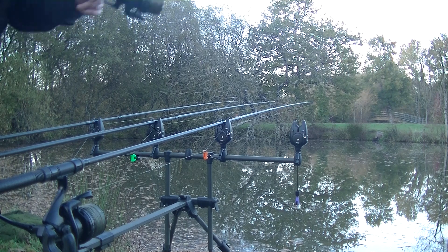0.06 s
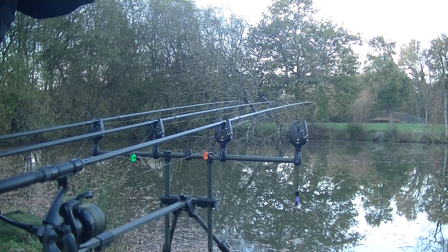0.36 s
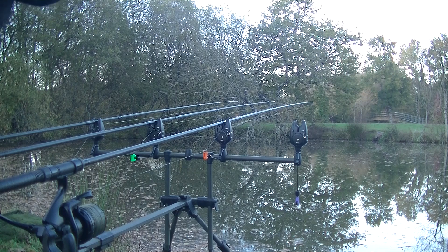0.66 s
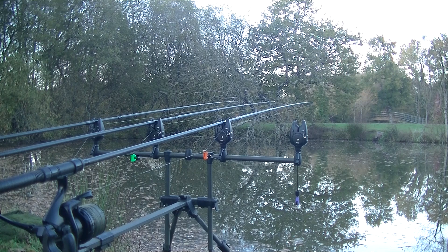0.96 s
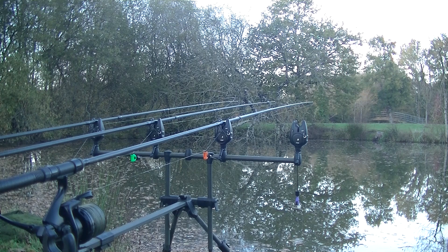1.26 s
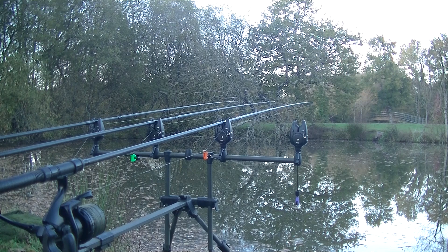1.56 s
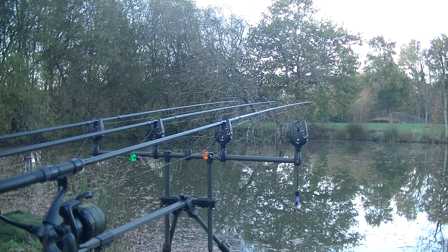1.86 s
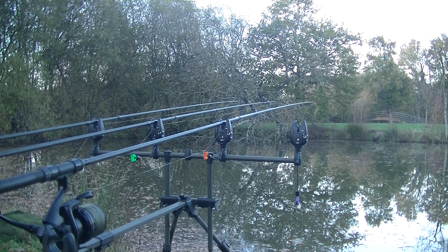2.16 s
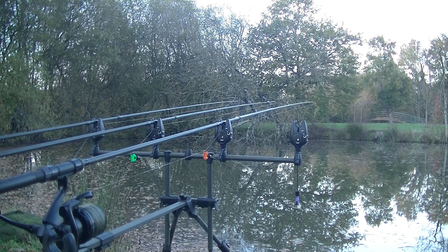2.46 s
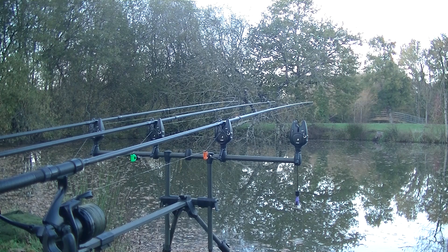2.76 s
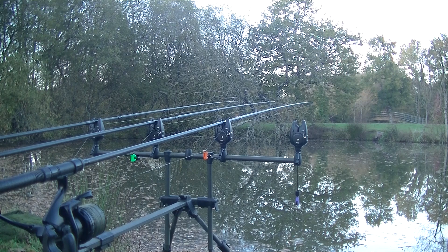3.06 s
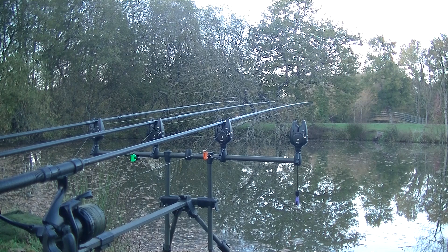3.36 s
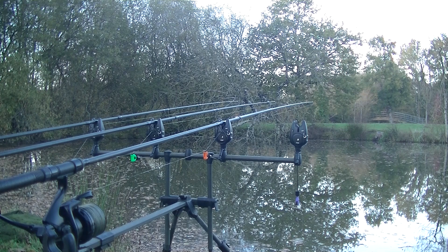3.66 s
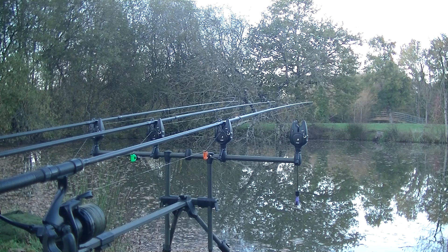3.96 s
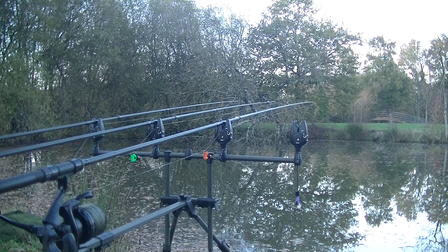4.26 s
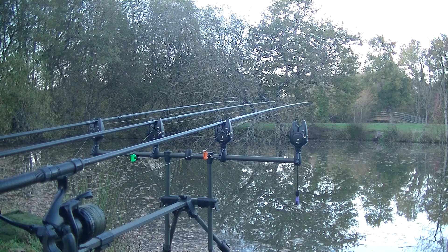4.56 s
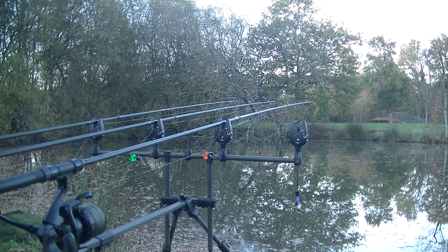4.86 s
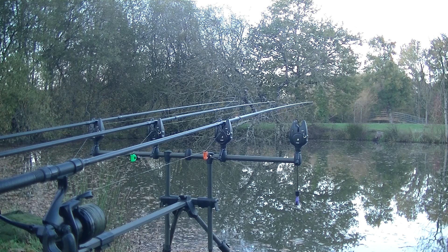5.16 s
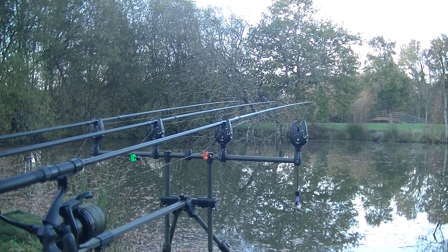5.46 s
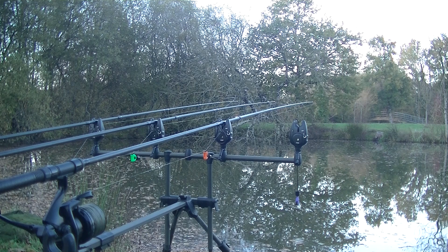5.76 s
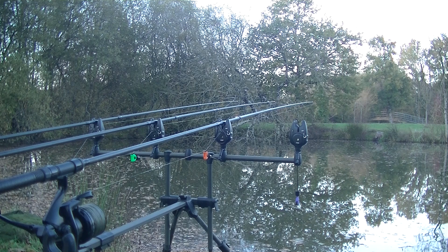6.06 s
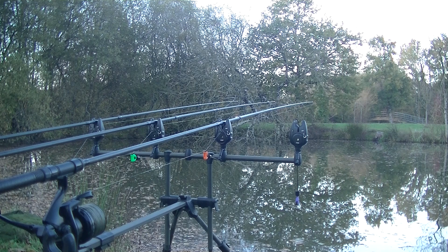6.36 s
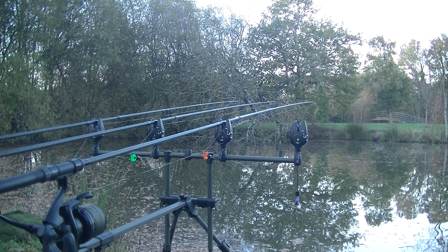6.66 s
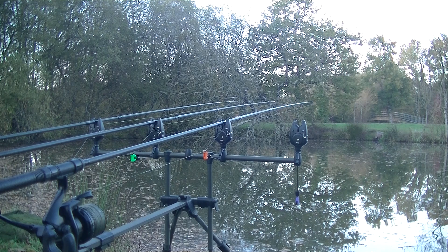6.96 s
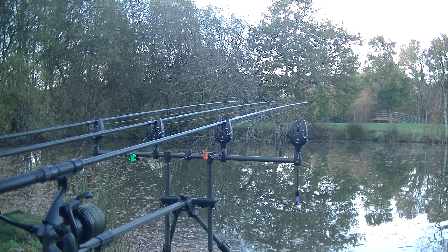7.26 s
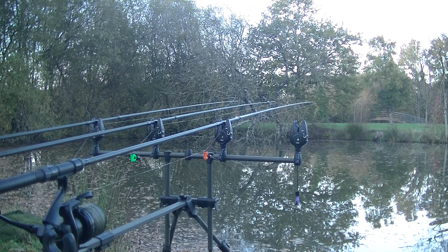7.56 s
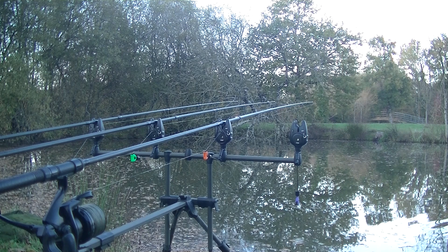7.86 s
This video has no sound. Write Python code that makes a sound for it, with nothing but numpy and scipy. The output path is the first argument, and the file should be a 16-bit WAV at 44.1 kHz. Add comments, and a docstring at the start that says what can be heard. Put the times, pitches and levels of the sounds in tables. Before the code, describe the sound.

Waterproof clothing rubs and swishes close by, quiet and uneven, over a faint, steady outdoor hush. The rustle starts softly, with stronger strokes around 1.3 and 2.1 seconds, while bits of fishing tackle give small, dry ticks throughout. At 3.2 seconds a hard piece of gear makes one sharp clack with a brief chatter, the loudest sound. The fabric then turns brighter and busier, fullest from about 4.2 to 5.1 seconds and again from 6 to 7, with sharper ticks near 4.4 and 6.6 seconds. Soft, low knocks come around 4.7 and 6.9 seconds. After 7 seconds the rustle dies down, leaving a cluster of ticks and light knocks near 7.8. A small bird gives three faint, thin, very high whistles, at the start, at 4.1 and at 7.5 seconds. The tackle and bird carry a short outdoor echo.

```python
"""Waterproof clothing rubs and swishes as an angler moves about beside a still pond.
Its threads catch and let go in tiny scratches, and its folds flap with each move of an arm or leg.
Faint outdoor air lies underneath, and a small bird gives three thin, high whistles.
Bits of tackle tick and one hard piece clacks. A few low knocks sound, some alone, some giving body
to the clack and ticks. The bank and the trees add a short echo to the bird and the tackle."""
import sys
import numpy as np
from scipy import signal
from scipy.fft import rfft, irfft, next_fast_len
from scipy.io import wavfile
from scipy.ndimage import uniform_filter1d, map_coordinates

SR = 44100
rng = np.random.default_rng(int(sys.argv[2]) if len(sys.argv) > 2 else 0)


def store_pcm(level_fs):
    """Save levels as 16-bit WAV."""
    pcm = np.round(np.clip(level_fs, -1, 1) * 32767).astype(np.int16)
    wavfile.write(sys.argv[1], SR, np.atleast_2d(pcm).T)


N = 348390

# Fabric sliding over fabric, one stroke for each move. Each row: start, rise, hold and fall in seconds,
# then level, brightness and sheen (the very high hiss of the weave) in dB.
STROKES = [(.336, 0.53, .38, .17, -55.5, -4.5, -11), (1.086, 0.032, 0.032, 0.079, -52.5, 5.5, -10.5),
           (1.246, .18, .137, .62, -43.5, 0.5, -10.5), (2.075, 0.11, .015, .145, -43.5, 6, -10.5),
           (2.231, .068, .308, 0.25, -47, 1.5, -10.5), (2.8, .06, 0.12, .05, -59.5, 1.5, -11),
           (2.98, 0.083, 0.21, .123, -42.5, 6, -8), (3.27, .025, 0.12, .044, -41, 2, -9.5),
           (3.358, .025, 0.054, 0.043, -37.8, 2, -8), (3.422, 0.044, 0.048, .1, -53, 0, -11),
           (3.516, 0.13, .03, .18, -48, 0, -12), (3.815, 0.078, .011, .092, -51, 3.5, -15),
           (3.938, .092, .01, .118, -55.5, -3, -13), (4.132, .06, 0.054, .04, -56, 3, -12),
           (4.233, 0.099, 0.3, .111, -40.5, 2, -10.5), (4.477, 0.093, .008, .056, -37, 3.5, -5),
           (4.658, 0.029, .015, .07, -45.5, -1, -13), (4.726, .189, .062, .267, -39.1, 3.5, -9.5),
           (5.008, 0.035, 0.055, 0.035, -36.5, 3, -12), (5.104, 0.26, 0.22, .055, -47.5, -1.5, -9.5),
           (5.64, 0.25, 0.17, 0.026, -51, -2.5, -13), (5.955, 0.13, 0.054, .179, -41, 2.5, -12),
           (6.15, .185, .277, .091, -46, 1.5, -14.5), (6.41, 0.068, .02, .04, -48, 3, -13),
           (6.672, .086, .009, .089, -54.7, -1.5, -14), (6.801, 0.1, .087, .372, -46.5, -2, -11.5),
           (7.656, .041, .032, .033, -55, 3, -14), (7.77, .08, .05, .05, -58, -5, -16)]
# How the angler stands. Each row: time in seconds, stance (0 stepping back, 1 close by, 2 turned away,
# 3 bent over the gear), boost of the highest treble in dB.
STANCES = [(0, 0, -7), (1.7, 0, -12), (2.3, 0.3, -4), (3.0, 0.4, -4), (3.4, 1, 0), (5.1, 1, 1), (5.3, 2, 2),
           (5.7, 2, 1), (6.0, 3, 2), (6.6, 3, 4), (6.85, 2.5, 4)]
# The tone of the swish in those four stances. Each row: frequency in Hz, level in dB.
SWISH_BACK = [(900, -40), (1500, -10.5), (2100, 0.5), (3100, 0.5), (3450, -1.5), (3950, 3.5), (4500, -2),
              (5000, -0.5), (5600, -6), (6400, -0.5), (8200, -1.5), (9300, -2), (10100, -12),
              (11500, -24.5)]
SWISH_CLOSE = [(900, -30.5), (1500, -11.5), (2100, -1), (2750, 1.5), (3900, -3), (4850, 1.5), (5700, -2.5),
               (6500, -0.5), (7450, -4), (8100, -2), (9200, -5.5), (10100, -16.5), (11500, -33)]
SWISH_AWAY = [(900, -29), (1500, -6), (2100, 0), (2700, 1), (3300, 1), (4000, -3.5), (4700, -0.5),
              (5250, 2), (5900, -3), (7300, -0.5), (8100, -1.5), (9400, -5), (10100, -14), (11500, -38)]
SWISH_BENT = [(900, -36), (1500, -11), (2200, -0.5), (3300, -0.5), (4100, -6.5), (4600, 1.5), (5250, 3),
              (5900, -1), (7000, -0.5), (7750, -4.5), (8200, -3), (9400, -6.5), (10100, -17), (11500, -34)]
# The tone of the folds, the weave and the open air. Each row: frequency in Hz, level in dB.
FLAP_TONE = [(40, -21), (150, -21.5), (230, -19), (330, 3.5), (600, 3), (1200, 5.5), (1600, -3.5),
             (2400, -41)]
SHEEN_TONE = [(8500, -38), (10200, -2.5), (11800, 2.5), (14000, 2.5), (15000, -4), (16000, -2)]
AIR_TONE = [(25, -13.5), (110, -13), (180, -13.5), (240, -9.5), (300, -4.5), (370, 1.5), (450, 0.5),
            (560, -7.5), (900, -2), (1500, -5), (4200, -7.5), (6000, -15), (9500, -16), (15500, -23.5)]
# Nearby things that reflect the rubbing. Each row: delay in seconds, level in dB.
REFLECTIONS = [(.0031, -20), (.0057, -18), (.0094, -18)]
# How alike left and right are, for close sounds and for the air.
# Each row: frequency in Hz, likeness (1 the same, 0 unrelated, -1 opposite).
CLOSE_LIKENESS = [(60, -0.29), (300, 0.48), (1200, 0.6), (2300, 0.98), (3400, 0.94), (4300, 0.7),
                  (5700, .75), (6600, .96), (9000, 0.96), (10000, 0.88), (11000, 0.99), (15000, 1)]
AIR_LIKENESS = [(60, -0.69), (130, -0.66), (290, 0.62), (640, 0.47), (1400, 0.29), (3100, 0.62),
                (7000, 0.91), (15000, 1)]
# How much louder the left side is. Each row: frequency in Hz, left minus right in dB.
LEFT_LOUDER = [(100, 0), (380, 4), (1300, 2.5), (2400, 0.9), (4400, 2.5), (8000, -1), (15000, 1)]
# How far the wave on the left runs ahead. Each row: frequency in Hz, lead in radians.
LEFT_LEAD = [(100, 0), (430, 0.6), (1000, 0.63), (1700, -0.61), (2400, 0.27), (3900, 0.1), (4600, -0.5),
             (5700, -0.47), (6400, -.1), (7200, -0.4), (8600, .05), (15000, 0)]
# The bird's calls. Each row: start and length in seconds, first and last pitch in Hz,
# level before mixing in dB.
BIRD_CALLS = [(.05, 0.15, 7350, 7200, -68), (4.083, .15, 7370, 7050, -62.5), (7.49, .16, 7540, 7180, -59)]
# The echo of bank and trees. Each row: frequency in Hz, fade time (to drop by 60 dB) in seconds.
ECHO_FADE = [(300, .2), (3000, 0.27), (12000, 0.19)]
# The clearest ticks of the tackle, and low knocks that sound alone or give body to the clack and ticks.
# Each row: start in seconds, level in dB, centre frequency in Hz, width in octaves, fade time in seconds.
TACKLE_TICKS = [(.151, -36, 3900, 0.52, .02), (.244, -43, 3960, 0.77, .05), (.265, -41, 1620, .22, .05),
                (.509, -39.5, 1920, 1.2, .025), (.566, -44, 1620, .25, .06), (.912, -32, 3110, 0.74, .06),
                (1.2, -29.5, 4400, 1.19, .022), (1.258, -36, 5500, 1.1, .015),
                (1.919, -31, 8600, .54, .015), (1.977, -30.5, 3070, 1.44, 0.014),
                (2.303, -31.5, 4550, .9, .037), (3.514, -29, 7430, 0.47, .017),
                (4.258, -30, 3470, 1.5, 0.02), (4.273, -29, 3470, 1.8, 0.018),
                (4.405, -25, 3170, 0.58, 0.033), (4.621, -28, 2640, .7, 0.021),
                (5.18, -28.5, 3000, 2, 0.021), (5.48, -35, 2600, 1.7, 0.019),
                (5.697, -41, 2400, 0.38, 0.027), (5.707, -33, 2270, .12, 0.046),
                (5.85, -30.5, 3220, 0.48, 0.072), (6.186, -26.5, 4630, 1.06, .02),
                (6.332, -26, 5230, 0.78, .016), (6.559, -20.5, 4050, 1.4, 0.0086),
                (6.593, -28.5, 2160, 1.3, 0.019), (6.691, -29.5, 5300, .65, 0.01),
                (6.758, -32, 8303, 0.26, 0.012), (6.851, -30.5, 2780, 1.24, 0.023),
                (7.211, -31, 1800, .95, 0.016), (7.247, -37, 2395, .19, .033),
                (7.293, -35, 1820, 1.6, 0.027), (7.689, -37, 6300, .61, 0.023),
                (7.787, -39.5, 4060, .59, .069), (7.826, -34.5, 6070, .49, .018),
                (7.852, -30.5, 2970, .5, .032), (7.894, -32, 3240, .55, .035)]
LOW_KNOCKS = [(1.31, -47, 400, .45, .08), (3.208, -29, 1050, .7, .05), (4.685, -38, 480, .6, .06),
              (6.853, -38, 370, .35, .07), (7.49, -51, 580, .3, .2), (7.704, -39, 450, .3, .06),
              (7.853, -38.5, 800, 1, .04)]
# The hard piece's first hit and its chatter. Each row: start in seconds, level in dB.
CLACK_HITS = [(3.2067, -13.5), (3.2136, -19), (3.2284, -24), (3.2322, -23.5)]
# The notes that piece rings with. Each row: frequency in Hz, relative level in dB, fade time in seconds.
CLACK_NOTES = [(890, -26, 0.062), (1710, -16.5, 0.055), (2055, -12, .05), (2530, -3, 0.031),
               (2970, 0, 0.023), (3190, -3, 0.034), (3850, -1.5, 0.027), (4057, -0.5, 0.04),
               (4490, 2, 0.016), (5180, 5, 0.0084), (7100, -6.5, .025)]
# The tone of the noisy crack in each hit. Each row: frequency in Hz, level in dB.
CRACK_TONE = [(200, -36), (600, -9), (4000, 1), (6000, -19), (14000, -19)]


def amp(db):
    """Turn decibels into a number to multiply a sound by."""
    return 10 ** (np.asarray(db) / 20)


def unit(x):
    """Scale a signal so that its average strength (rms) is 1."""
    return x / np.sqrt(np.mean(x ** 2) + 1e-20)


def along(points, hz):
    """Read a table at any frequency, sliding between its rows on a log scale."""
    row_hz, values = np.transpose(points)
    return np.interp(np.log(hz + 1), np.log(row_hz + 1), values)


def curves(rows):
    """Turn each column after the time into one value per sample."""
    times, *columns = np.transpose(rows)
    return [np.interp(np.arange(N) / SR, times, column) for column in columns]


def wobble(rate):
    """A smooth curve through random points, `rate` of them a second."""
    points = rng.standard_normal(int(N * rate / SR) + 4)
    coarse = np.linspace(0, N, N // 16)
    return np.interp(np.arange(N), coarse, map_coordinates(points, [coarse * rate / SR]))


def filtered(x, response):
    """Multiply each frequency in a sound by response(hz)."""
    length = x.shape[-1]
    padded = next_fast_len(length + SR // 8)
    hz = np.fft.rfftfreq(padded, 1 / SR)
    return irfft(rfft(x, padded) * response(hz), padded)[..., :length]


def coloured(x, tone):
    """Shape a sound with a tone table, then scale it to strength 1."""
    return unit(filtered(x, lambda hz: amp(along(tone, hz))))


def add(track, start, sound):
    """Mix a sound into a track at a start time in seconds."""
    room = track[..., round(start * SR):][..., :sound.shape[-1]]
    room += sound[..., :room.shape[-1]]


def stereo(pair, likeness):
    """Blend two unrelated noises into left and right, slightly apart in level and timing."""
    angle = lambda hz: np.arccos(np.clip(along(likeness, hz), -1, 1)) / 2
    mid, side = filtered(pair, lambda hz: np.array([np.cos(angle(hz)), np.sin(angle(hz))]))
    half = np.array([[.5], [-.5]])
    offsets = lambda hz: amp(half * along(LEFT_LOUDER, hz)) * np.exp(1j * half * along(LEFT_LEAD, hz))
    return filtered(np.array([mid + side, mid - side]), offsets)


def rubbing(idle_db, idle_bright_db, idle_sheen_db):
    """Level, brightness and sheen in dB: strokes add to a faint idle rub; the loudest colours it most."""
    t = np.arange(N) / SR
    power = np.full(N, amp(idle_db) ** 2)
    bright, sheen = idle_bright_db * power, idle_sheen_db * power
    for start, rise, hold, fall, db, bright_db, sheen_db in STROKES:
        speed = np.interp(t, start + np.cumsum([0, rise, hold, fall]), [0, 1, 1, 0])
        stroke_power = (amp(db) * speed) ** 2
        power += stroke_power
        bright += bright_db * stroke_power
        sheen += sheen_db * stroke_power
    return 10 * np.log10(power), bright / power, sheen / power


def thread_slips(per_second, spread_db, hiss_db):
    """Threads catch and let go in uneven scratches about a millisecond long, over a smooth hiss."""
    sizes = (rng.random(N) < per_second / SR) * amp(spread_db * rng.random(N))
    release = np.exp(-np.arange(SR // 200) / SR / .0006)
    power = np.abs(signal.fftconvolve(sizes ** 2, release ** 2)[:N])
    scratches = unit(np.sqrt(power) * rng.standard_normal((2, N)))
    return unit(scratches + amp(hiss_db) * rng.standard_normal((2, N)))


def creases(x, depth_db):
    """Each crease briefly favours its own frequencies, in patches about 1 kHz wide and 20 ms long."""
    spectra = signal.stft(x, nperseg=128)[2]
    patches = uniform_filter1d(rng.standard_normal(spectra.shape[1:]), size=3, axis=0)
    patches = uniform_filter1d(patches, size=12, axis=1)
    return signal.istft(spectra * amp(depth_db * unit(patches)), nperseg=128)[1][:, :N]


def reflected(x, sway):
    """Nearby things bounce the sound back along paths that shift as the angler sways."""
    total = x
    for delay, db in REFLECTIONS:
        lag = np.round(SR * delay * (1 + sway * wobble(2))).astype(int)
        total = total + amp(db) * x[:, np.clip(np.arange(N) - lag, 0, N - 1)]
    return total


def clothing(rub_db, bright_db, sheen_db):
    """Rubbing fabric: a swish that changes with the stance, flapping folds and the weave's sheen."""
    stance, treble_db = curves(STANCES)
    threads = creases(thread_slips(per_second=600, spread_db=13.0, hiss_db=3.5), depth_db=1.47)
    friction = stereo(reflected(threads, sway=.01), CLOSE_LIKENESS)
    swish = sum(np.clip(1 - abs(stance - k), 0, 1) * coloured(friction, tone)
                for k, tone in enumerate([SWISH_BACK, SWISH_CLOSE, SWISH_AWAY, SWISH_BENT]))
    dull = filtered(swish, lambda hz: 1 / (1 + (hz / 5700) ** 6))
    swish = amp(-bright_db / 2) * dull + amp(bright_db / 2) * (swish - dull)  # fast strokes are brighter
    flap = amp(-14 - 0.67 * bright_db) * coloured(friction, FLAP_TONE)  # slow, dull strokes flap more
    sheen = coloured(friction, SHEEN_TONE)
    treble = filtered(sheen, lambda hz: np.clip((hz - 13000) / 1500, 0, 1))  # the body easily blocks this
    sheen = amp(sheen_db) * (sheen + (amp(treble_db) - 1) * treble)
    judder_db = 0.74 * wobble(50) + 0.31 * wobble(13)  # folds grip and let go unevenly
    return amp(rub_db + judder_db) * (swish + flap + sheen)


def air(level_db, drift_db):
    """The steady hush of the open air and the microphone."""
    gain = amp(level_db + drift_db * wobble(3.13))
    return gain * coloured(stereo(rng.standard_normal((2, N)), AIR_LIKENESS), AIR_TONE)


def bird(waver_hz, flutter_db):
    """A small bird whistles thin, slightly falling notes with a quick waver."""
    track = np.zeros(N)
    for start, length, first_hz, last_hz, db in BIRD_CALLS:
        count = int(length * SR)
        progress = np.arange(count) / (length * SR)
        hz = first_hz + (last_hz - first_hz) * progress + waver_hz * wobble(533)[:count]
        swell = np.sin(np.pi * progress ** 0.8) * amp(flutter_db * wobble(144)[:count])
        whistle = np.sin(2 * np.pi * np.cumsum(hz) / SR)
        add(track, start, amp(db) * unit(swell * whistle))
    return np.array([track, track])


def echo(x):
    """The bank and the trees scatter a sound into a short, blurred tail."""
    hz, t, spectra = signal.stft(rng.standard_normal((2, SR // 2)), SR, nperseg=256)
    fade = amp(-60 * t / along(ECHO_FADE, hz)[:, None])
    tail = signal.istft(spectra * fade, SR, nperseg=256)[1]
    return signal.fftconvolve(x, tail / np.linalg.norm(tail[0]), axes=1)[:, :N]


def contacts(rows, skirt_db, ring_db):
    """Each tick or knock is a quickly fading band of noise, with five notes of the rod ringing in it."""
    track, t = np.zeros((2, N)), np.arange(SR // 8) / SR
    for start, db, centre_hz, octaves, fade_s in rows:
        band = lambda hz: np.exp(-.5 * (np.log2((hz + 1) / centre_hz) / octaves) ** 2)
        # the skirt is a faint, wide spread of sound on both sides of the band
        skirt = lambda hz: amp(skirt_db) * hz / (hz + centre_hz) / (1 + (hz / centre_hz / 2) ** 2)
        noise = stereo(rng.standard_normal((2, len(t))), CLOSE_LIKENESS)
        burst = unit(filtered(noise, lambda hz: band(hz) + skirt(hz)))
        note_hz = centre_hz * 2 ** (octaves * rng.uniform(-.8, .8, size=(5, 1)))
        ring = unit(np.sin(2 * np.pi * (note_hz * t + rng.random(note_hz.shape))).sum(axis=0))
        loudness = amp(db - 7 - 60 * t / fade_s) * (1 - np.exp(-t * centre_hz))
        add(track, start, loudness * unit(burst + amp(ring_db) * ring))
    return track


def jostled_bits(rub_db, per_second, usual_hz, octaves, fade_s):
    """Loose bits tick by chance, louder when movement shakes them harder; gives rows for contacts()."""
    level_db = -37 + 0.67 * (rub_db + 50)  # 13 dB above the rub when the rub is at -50 dB
    rows = []
    for when, size, pitch in rng.random((round(per_second * N / SR), 3)):
        db = level_db[int(when * N)] + 2.5 * (2 * size - 1)
        centre_hz = usual_hz * 2 ** (.8 * (2 * pitch - 1))
        rows.append((when * N / SR, db, centre_hz, octaves, fade_s))
    return rows


def clack(crack_db, phase_spread):
    """A hard piece is struck, chatters and rings; each note reaches left and right a bit out of step."""
    track, t = np.zeros((2, N)), np.arange(SR // 6) / SR
    hz, note_db, fade_s = np.transpose(CLACK_NOTES)[:, :, None]
    for start, db in CLACK_HITS:
        phase = phase_spread * rng.standard_normal((2, len(CLACK_NOTES), 1))
        phase += rng.uniform(0, 2 * np.pi, hz.shape)
        ring = np.sum(amp(note_db - 60 * t / fade_s) * np.sin(2 * np.pi * hz * t + phase), axis=1)
        crack = amp(crack_db - 60 * t / 0.033) * coloured(rng.standard_normal((2, len(t))), CRACK_TONE)
        hit = (ring + crack) * (1 - np.exp(-t / 0.00028))
        add(track, start, amp(db) * hit / np.abs(hit).max())
    return track * amp([[1.5], [-1.5]])  # a little to the left


def scene():
    """Mix the nearby clothing and tackle with the air and the bird among the trees."""
    rub_db, bright_db, sheen_db = rubbing(idle_db=-64, idle_bright_db=-3, idle_sheen_db=-12)
    rustle = clothing(rub_db, bright_db, sheen_db)
    hush = air(level_db=-60.5, drift_db=-0.1)
    calls = bird(waver_hz=110, flutter_db=2.0)
    knocks = contacts(LOW_KNOCKS, skirt_db=-36, ring_db=-7.5)
    hard_clack = clack(crack_db=-5.5, phase_spread=.2)
    chance_ticks = jostled_bits(rub_db, per_second=7, usual_hz=5000, octaves=.8, fade_s=.02)
    ticks = contacts(list(TACKLE_TICKS) + chance_ticks, skirt_db=-25, ring_db=-7.0)
    # a low cut, like the microphone's, takes the deep thump out of the tackle
    low_cut = signal.butter(2, 220, "highpass", fs=SR, output="sos")
    tackle = signal.sosfilt(low_cut, knocks + hard_clack + ticks)
    echoes = amp(-13.5) * echo(tackle) + amp(-6) * echo(calls)
    return rustle + hush + amp(-4.5) * calls + tackle + echoes


def record(dry):
    """Cut away the very highest treble, above 15850 Hz."""
    return filtered(dry, lambda hz: hz < 15850)


dry = scene()
out = record(dry)
store_pcm(out)
```